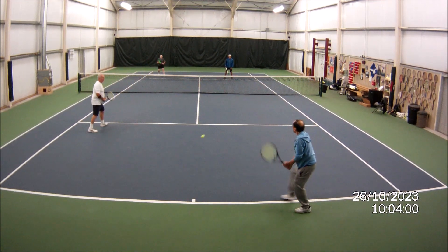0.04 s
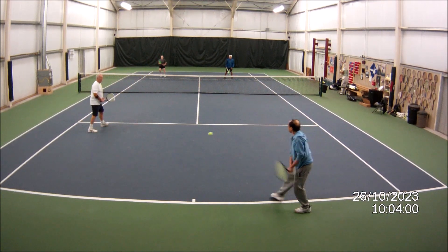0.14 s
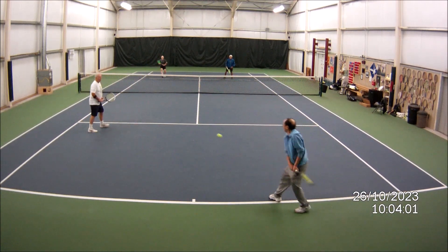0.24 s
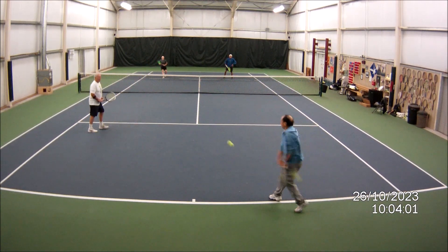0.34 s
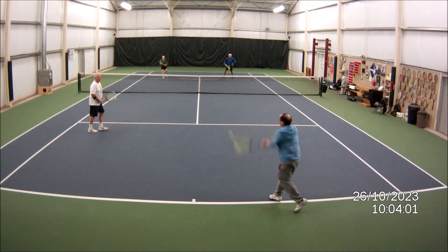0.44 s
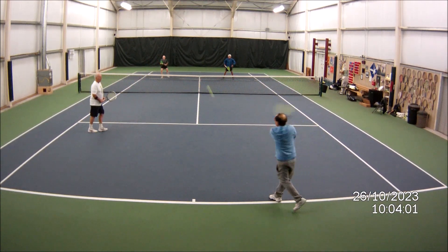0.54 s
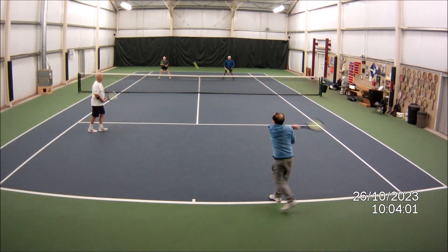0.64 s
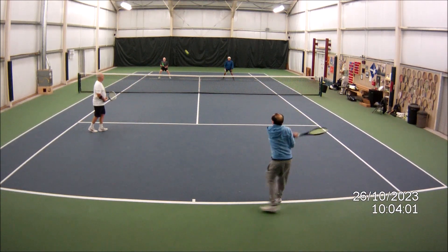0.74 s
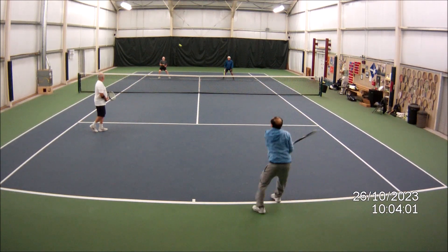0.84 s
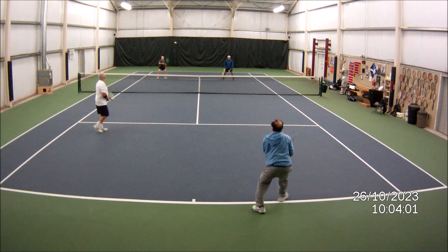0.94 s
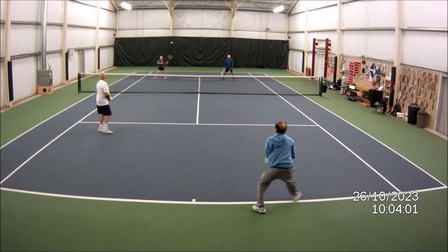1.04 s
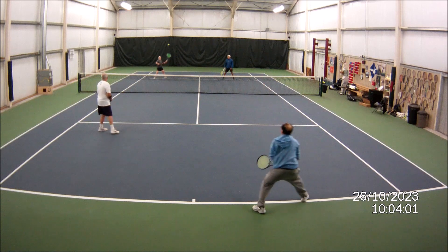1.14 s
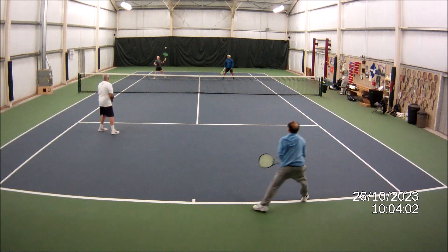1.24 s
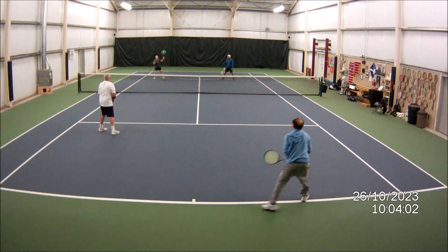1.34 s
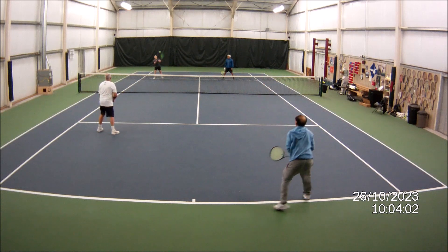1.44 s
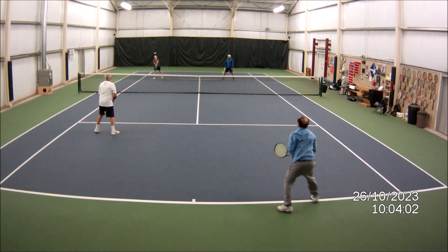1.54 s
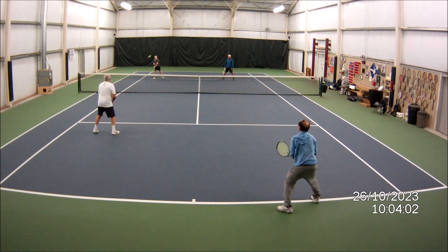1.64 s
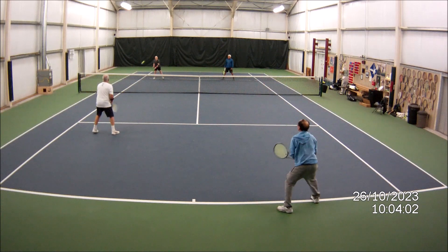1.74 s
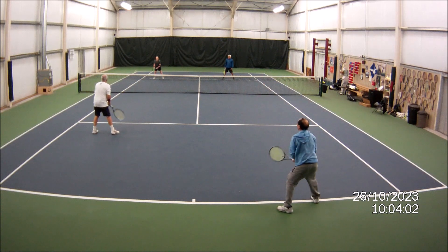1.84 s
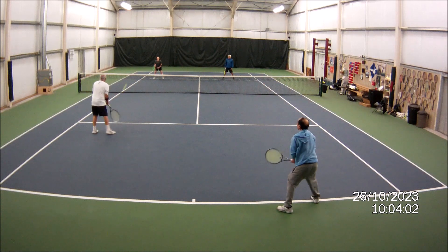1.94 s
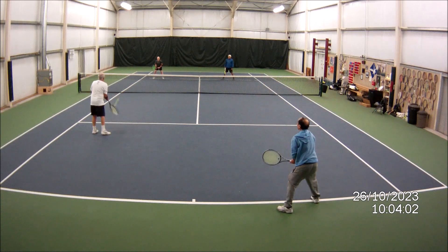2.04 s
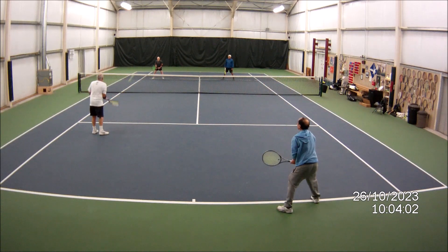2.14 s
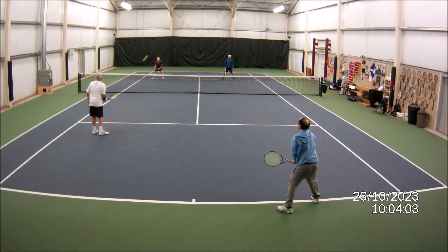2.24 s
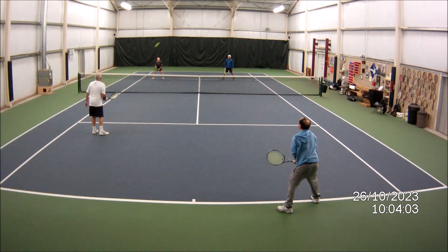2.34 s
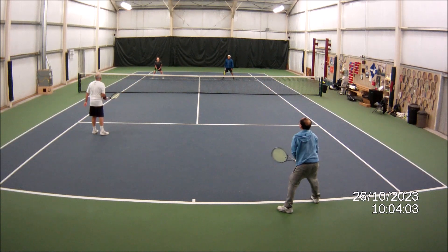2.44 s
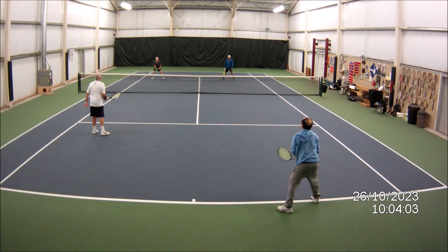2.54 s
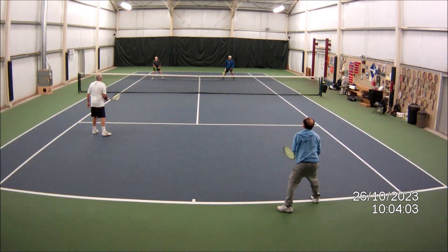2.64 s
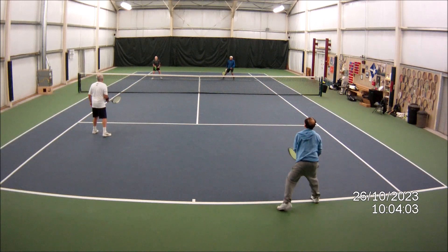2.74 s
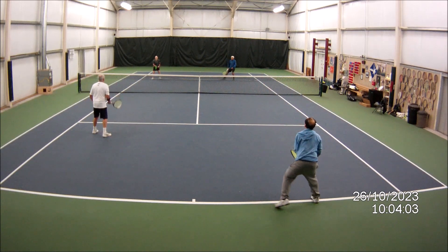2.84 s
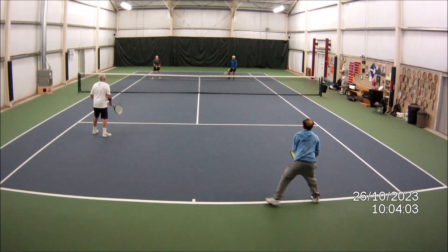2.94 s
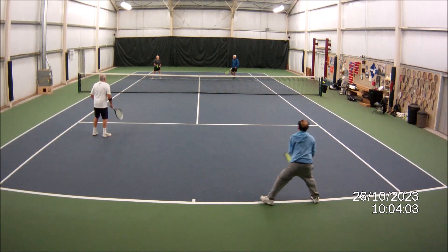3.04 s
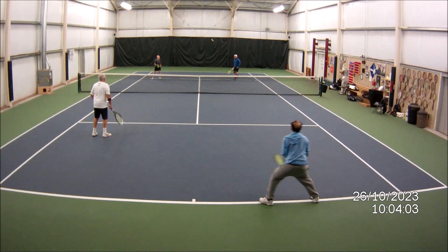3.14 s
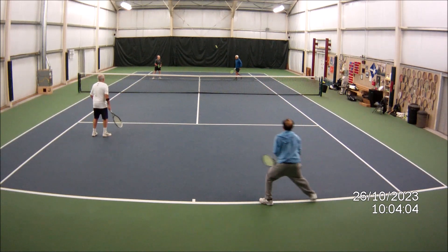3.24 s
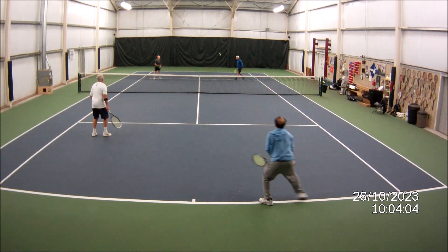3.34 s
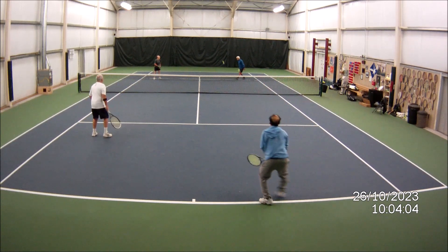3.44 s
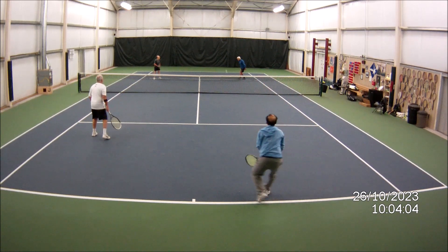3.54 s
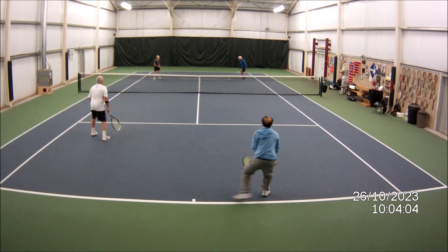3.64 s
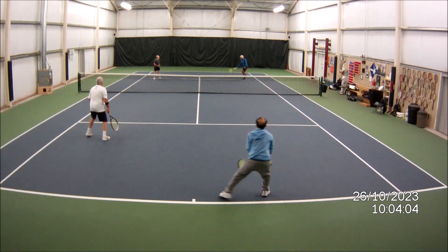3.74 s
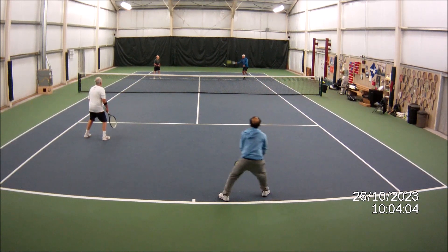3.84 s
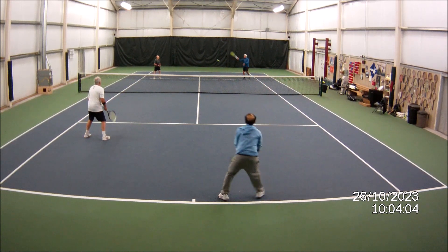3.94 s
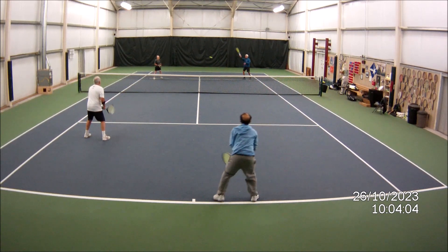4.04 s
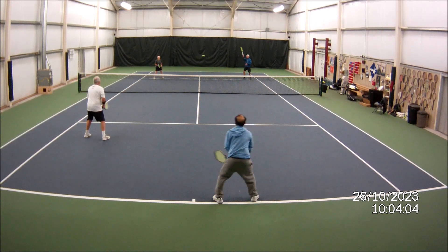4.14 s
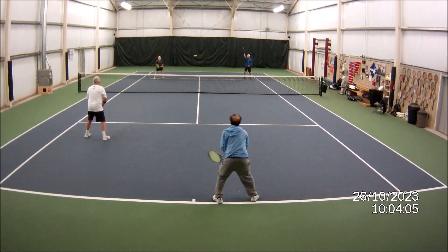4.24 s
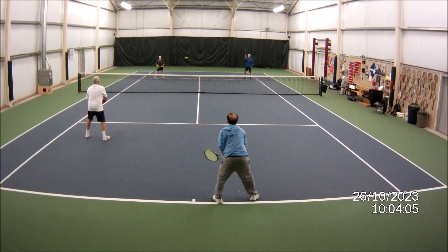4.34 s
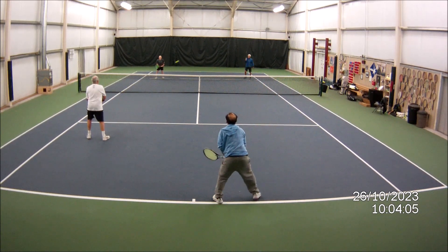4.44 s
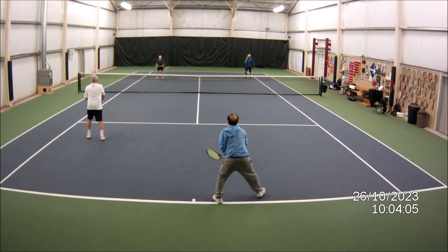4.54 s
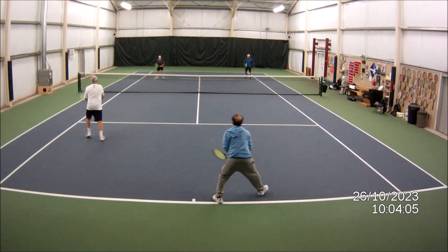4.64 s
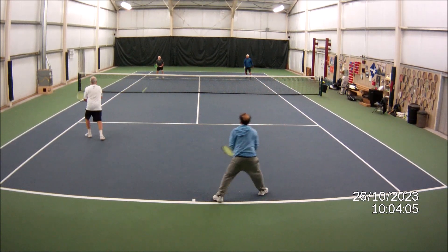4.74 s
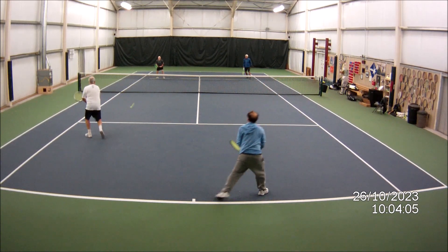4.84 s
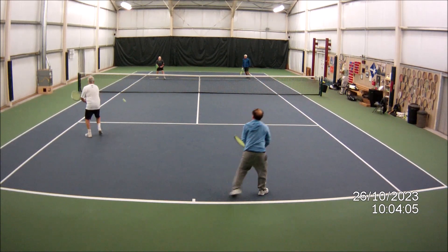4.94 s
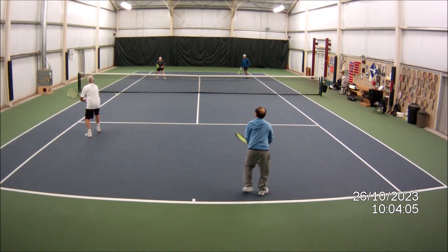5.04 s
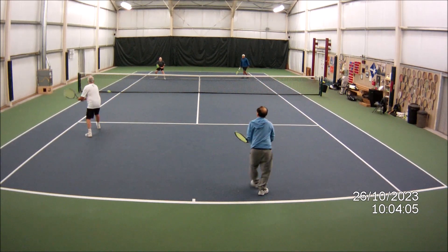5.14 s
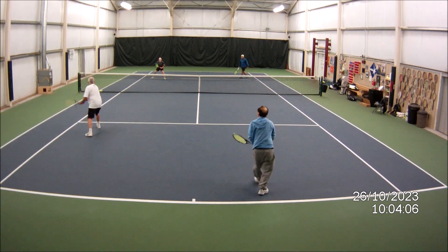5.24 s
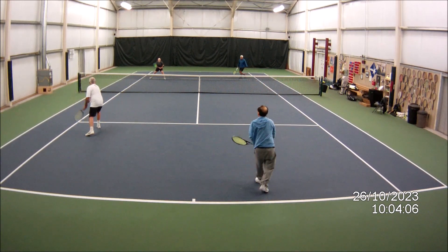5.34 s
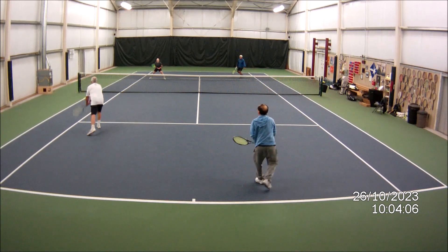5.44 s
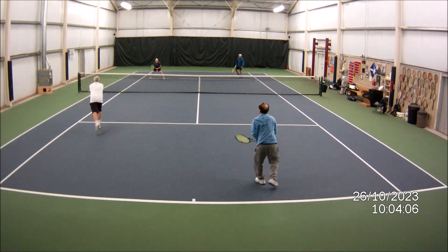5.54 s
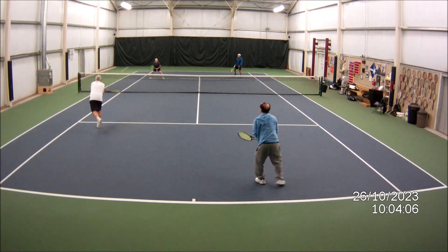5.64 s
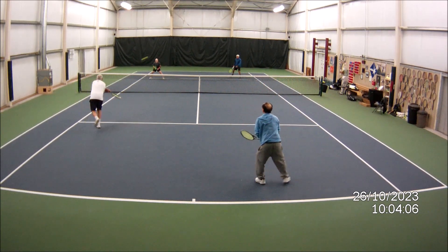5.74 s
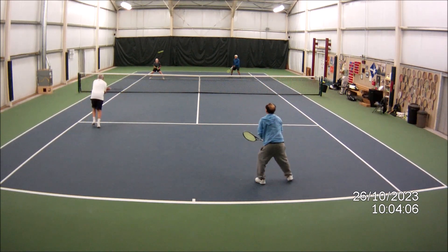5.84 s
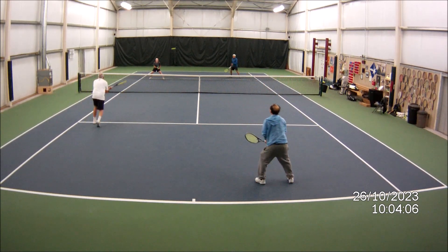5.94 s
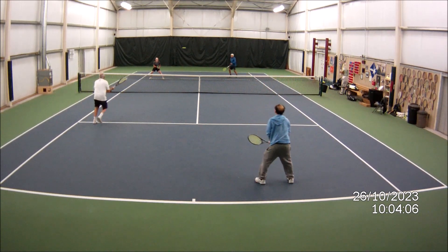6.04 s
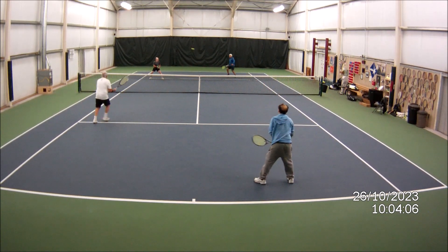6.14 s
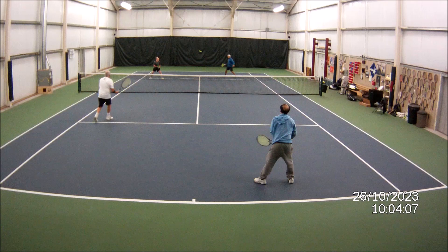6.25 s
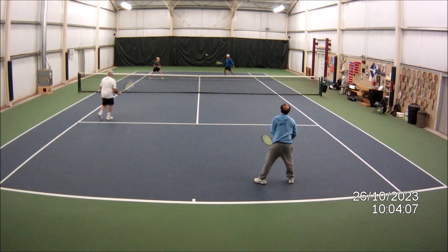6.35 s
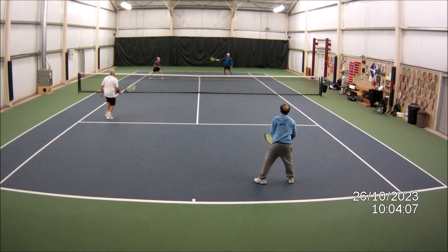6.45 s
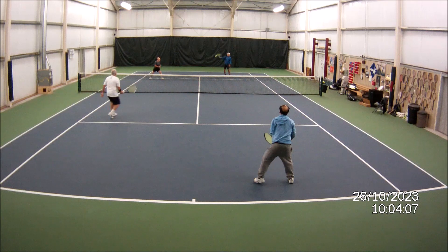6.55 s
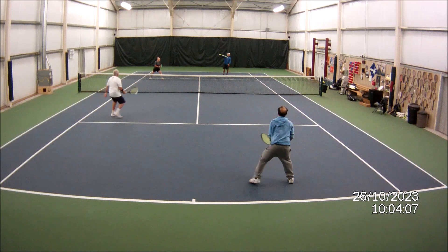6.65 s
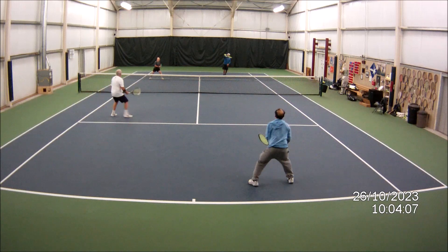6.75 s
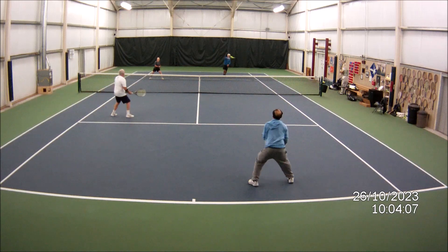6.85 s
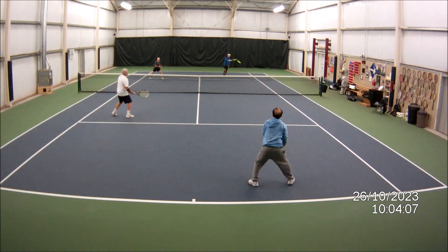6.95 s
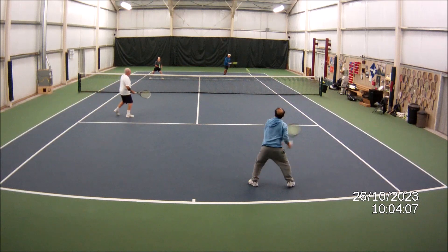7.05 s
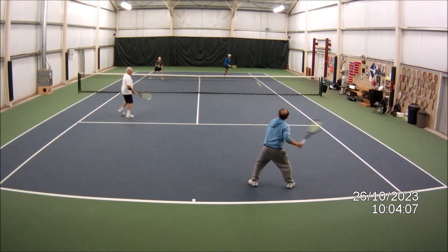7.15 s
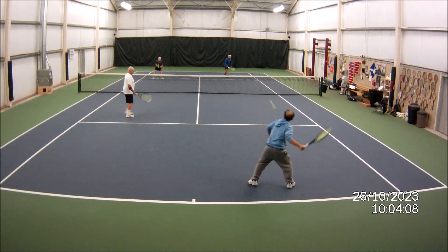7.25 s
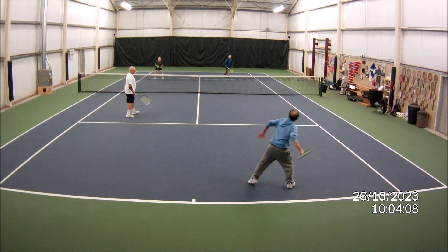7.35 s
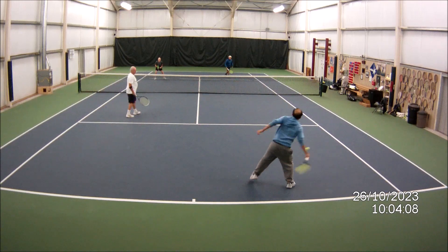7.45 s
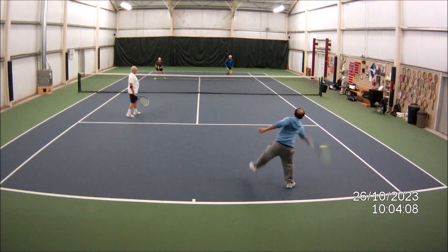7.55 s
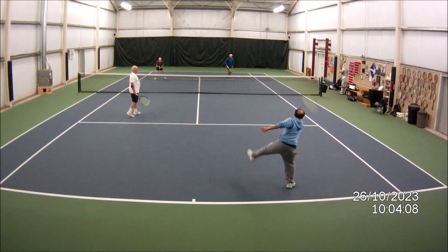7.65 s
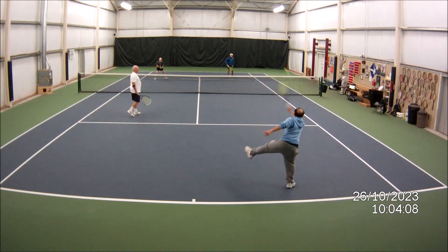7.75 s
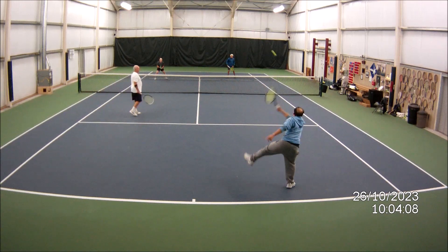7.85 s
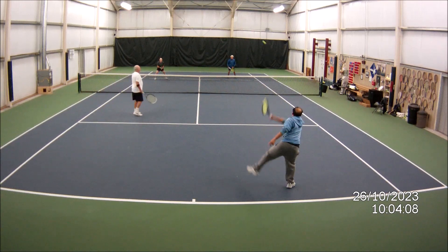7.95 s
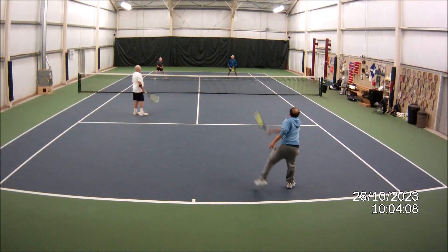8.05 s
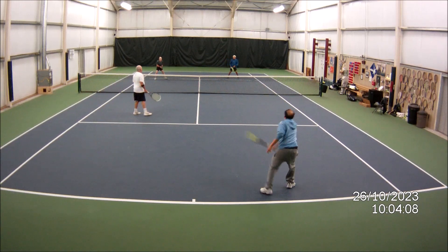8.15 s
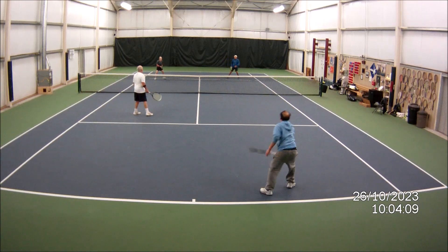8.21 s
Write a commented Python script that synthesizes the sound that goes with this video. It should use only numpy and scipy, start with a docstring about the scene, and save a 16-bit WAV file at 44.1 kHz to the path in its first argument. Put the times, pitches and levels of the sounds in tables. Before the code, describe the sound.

In a large, reverberant indoor court, racquets strike a tennis ball six times at an uneven pace. With the microphone behind one end, near hits crack sharply and far ones sound like hollow, echoing pocks. The ball bounces quietly and shoes scuff throughout, with rubber soles squeaking briefly just after the first hit and again near the end, over a faint hiss and hum.

```python
"""You hear a doubles tennis rally echoing in a big steel-clad hall, from behind one baseline.
Shoes scuff over the gritty court, the hollow ball bounces, and racquets hit it with a crack,
a pock and a thump. Twice, rubber soles squeak as they stick and slip. The farther away a hit is,
the more of it comes by way of the hall; its distance also sets when the far wall's echo returns.
A soft hiss and a faint mains hum lie underneath."""
import sys
import numpy as np
from scipy import signal
from scipy.fft import rfft, irfft
from scipy.io import wavfile

SR = 44100
rng = np.random.default_rng(int(sys.argv[2]) if len(sys.argv) > 2 else 0)


def materialize(psi):
    """Save the field psi as 16-bit PCM at rate SR to the path in sys.argv[1].

    A 1-D psi becomes a single channel; in a 2-D psi each row is a channel.
    """
    bounded = np.clip(np.atleast_2d(psi).T, -1, 1)
    quanta = np.round(bounded * 32767).astype(np.int16)
    wavfile.write(sys.argv[1], SR, quanta)


N = 365148
TOP_HZ = 15500  # upper edge of the treble


def undb(db):
    """Turn decibels into a number to multiply by."""
    return 10 ** (np.asarray(db) / 20)


def clock(seconds):
    """The time of each sample in a stretch of sound."""
    return np.arange(int(seconds * SR)) / SR


def level(x, db):
    """Set a sound's average (rms) level."""
    return x * undb(db) / np.sqrt(np.mean(x ** 2))


def blow(x, db):
    """Set a short sound's level as if its energy were spread over 10 ms."""
    return x * undb(db) / np.sqrt(np.sum(x ** 2) / (SR / 100))


def add(track, at, x):
    """Mix a sound into a track, starting at a time in seconds."""
    i = max(int(at * SR), 0)
    track[i:i + len(x)] += x[:len(track) - i]


def noise(points, count, tilt_db=0):
    """Noise shaped by (f/Hz, level/dB) points, plus tilt_db for each octave above 2000 Hz."""
    hz, db = np.transpose(points)
    octave = np.log2(np.clip(np.fft.rfftfreq(count, 1 / SR), hz[0], None))
    tilt = tilt_db * np.maximum(octave - np.log2(2000), 0)
    gain = undb(np.interp(octave, np.log2(hz), db) + tilt)
    return level(irfft(rfft(rng.standard_normal(count)) * gain, count), 0)


def wobble(t, rate_hz):
    """A curve that slides to a new random value rate_hz times a second."""
    return np.interp(t * rate_hz, np.arange(len(t)), rng.standard_normal(len(t)))


def ring(modes, t, contact_s):
    """A struck thing's tones swell during contact and fade; t60 is the time to fade by 60 dB."""
    swell = np.sin(np.pi / 2 * np.clip(t / contact_s, 0, 1)) ** 2
    detune = 1 + 0.0086 * rng.standard_normal(len(modes))
    return swell * sum(undb(db - 60 * t / t60) * np.sin(2 * np.pi * hz * d * (t - contact_s))
                       for (hz, db, t60), d in zip(modes, detune))


def hall_share_db(distance_m, balance_m=11.94):
    """The hall's share grows with distance: the direct sound weakens, but the hall's does not."""
    return 20 * np.log10(distance_m / balance_m)


# the tone colour of the quiet hall: f/Hz, relative level/dB
AIR_COLOUR = [(15, -61), (25, -7), (59, -19), (104, -14), (173, -2), (289, -6), (482, -11.5), (826, -7),
              (1200, -9.5), (1490, -5.5), (3440, -7), (6050, -2), (9810, -15), (14300, -18.5), (15500, -21)]
def air(hiss_db=-61, hum_db=-81):
    """The hall at rest: a soft hiss and the mains hum of its fittings."""
    hum = np.sin(2 * np.pi * 60 * np.arange(N) / SR)
    return undb(hiss_db) * noise(AIR_COLOUR, N) + level(hum, hum_db)


# the tone colour of a sole rubbing on grit: f/Hz, relative level/dB
GRIT_COLOUR = [(150, -20.5), (500, -24), (1000, -18), (2200, -8), (3500, -3), (5000, 1), (6400, 3),
               (7500, -2.5), (9000, -10.5), (12000, -19.5), (15500, -33)]
# shoe slides: t/s, distance/m, length/s, level/dB, treble tilt/(dB per octave)
SHOE_SLIDES = [ (0.043, 4.3, 0.059, -51.5, 1), (0.764, 12.4, 0.029, -34.5, -1.5),
               (0.815, 23, 0.018, -43.5, -3), (1.117, 5.3, 0.028, -45, 2), (1.252, 8.3, 0.14, -48.5, 4.5),
               (1.484, 6.7, .054, -42.5, 1), (1.852, 5, 0.25, -44, 4), (2.713, 9.7, 0.16, -59, 0),
               (2.976, 15, 0.15, -54, 2), (3.184, 25, 0.095, -53, -4), (3.262, 6, 0.22, -47, 10),
               (3.494, 7, 0.071, -44, 1.5), (3.72, 5, 0.069, -46, 9), (3.91, 4.5, 0.096, -38, -2),
               (4.023, 7.7, 0.031, -41.5, -1.5), (4.376, 11.4, 0.033, -46.5, 0.5),
               (4.522, 12, 0.04, -50.5, 0), (4.715, 13.6, .013, -43, -3.5), (4.81, 4, 0.096, -51.5, 14),
               (4.975, 9.2, 0.031, -51.5, 6), (5.212, 4, .01, -53, 7), (5.399, 28, 0.11, -52.5, 5),
               (5.676, 10.6, .058, -42.5, -0.5), (5.921, 9.3, 0.055, -39.5, -2),
               (6.177, 12.2, 0.051, -42, -1), (6.73, 5, .089, -44.5, 4), (6.998, 7.3, .034, -45, 0),
               (7.283, 5, .13, -59, 8), (7.849, 5, 0.15, -46, -2.5)]
def scuffs(near, far, catch_db=2.0, catch_hz=260, tread_hz=4600, tread_db=4, glance_share=0.2):
    """A sole drags over grit, catching and letting go; its tread rings differently on each slide."""
    t = clock(1 / 3)
    for at, distance_m, length, db, bright_db in SHOE_SLIDES:
        catches = undb(catch_db * wobble(t, catch_hz))
        press = np.clip(t / length / 0.12, 0, 1)
        release = np.clip(.5 + (1 - t / length) / 0.62, 0, 1)
        grit = noise(GRIT_COLOUR, len(t), tilt_db=bright_db)
        ring_hz = tread_hz * 2 ** rng.uniform(-0.64, 0.63)
        tread = signal.lfilter(*signal.iirpeak(ring_hz, Q=9, fs=SR), grit)
        scuff = level(grit + (undb(tread_db) - 1) * tread, db) * press * release * catches
        # a reflection right behind the direct sound colours it
        glance = glance_share * np.interp(t - 0.001308, t, scuff, left=0)
        add(near, at, (scuff + glance) / np.hypot(1, glance_share))
        add(far, at, undb(hall_share_db(distance_m)) * scuff)


# the hall's lingering sound, band by band: f/Hz, relative level/dB, t60/s
HALL_BANDS = [(120, 2.5, 1.9), (280, -2, 1.25), (514, -8.5, 1.3), (770, -8, 1.24), (853, -9, 2.7),
              (886, -11, 1.5), (1660, -5, 0.89), (2120, -4.5, 1.07), (2990, -3.5, 1.27), (4800, -1, 1.34),
              (6100, 0.5, 1.23), (8900, -1, 1.07), (15000, -3.5, 0.6)]
def hall(x, build_s=0.0076):
    """Countless echoes blend into a tail; each band of pitch has its own strength and fade."""
    t = clock(2)
    hz, db, t60 = np.transpose(HALL_BANDS)
    log_f = np.log(np.fft.rfftfreq(len(t), 1 / SR) + 1)
    white = rfft(rng.standard_normal(len(t)))
    tail = 0
    for share, band_db, decay in zip(np.eye(len(hz)), db, t60):
        fade = undb(-60 * t / decay) * np.clip(t / build_s, 0, 1) ** 2
        band = irfft(white * np.interp(log_f, np.log(hz), share), len(t))
        tail = tail + band * fade * undb(band_db) / np.sqrt(np.sum(fade ** 2))
    return signal.fftconvolve(x, tail)[:N]


# the tones of the hollow, felt-covered ball: f/Hz, relative level/dB, t60/s
BALL_TONES = [(800.5, -2.5, 0.02), (976, 8, 0.013), (1133, -2, 0.018), (1365, 4, 0.016), (1547, 1, 0.031)]
def ball(t, db, tilt_db):
    """The ball rings with a pock; a harder contact (more tilt_db) favours its higher tones."""
    tones = [(hz, tone_db + tilt_db * np.log2(hz / 1000), t60) for hz, tone_db, t60 in BALL_TONES]
    return blow(ring(tones, t, contact_s=.005), db)


# the low tones of a dull thump: f/Hz, relative level/dB, t60/s
THUMP_TONES = [(173, -7.5, 0.03), (258.3, 4.5, 0.031), (369, -2.5, 0.036), (654, -5, 0.019)]
# the tone colour of a slap or crack: f/Hz, relative level/dB
CRACK_COLOUR = [(200, -22), (600, -10.5), (1200, -4.5), (2400, -4), (3300, -4), (4200, -2), (6300, 0),
                (7500, -7), (9000, -15), (12000, -26.5), (15500, -38)]
# knocks on the court: t/s, distance/m, slap/dB, pock/dB, thump/dB, hardness/(dB per octave)
COURT_KNOCKS = [ (0.083, 16, -49, -48, -61.5, -9.5), (.345, 13.5, -50.5, -48.5, -58, -27),
                (3.654, 20.6, -46.5, -49, -61.5, 0), (3.769, 23.8, -40, -48, -63.5, 3),
                (4.854, 11.5, -46.5, -46, -55.5, 6), (7.113, 17, -66, -48, -72, -3),
                (7.385, 11.5, -40.5, -46, -51.5, -2), (8.088, 5.9, -40.5, -59, -53, -16)]
def knocks(near, far, attack_s=0.0015, slap_t60=0.032):
    """Ball bounces and other knocks on the hard court: a thump, a hollow pock and a small slap."""
    t = clock(1 / 10)
    envelope = np.clip(t / attack_s, 0, 1) * undb(-60 * t / slap_t60)
    for at, distance_m, slap_db, pock_db, thump_db, hardness_db in COURT_KNOCKS:
        thump = blow(ring(THUMP_TONES, t, contact_s=0.0039), thump_db)
        slap = noise(CRACK_COLOUR, len(t), tilt_db=-1.5) * envelope
        pock = ball(t, pock_db, hardness_db)
        radiate(near, far, at, distance_m, thump, pock, slap, slap_db)


def reflections(points, first_s=.014, full_s=0.023, t60=0.33, patchy_db=4.5, tilt_db=0):
    """Early echoes off the side walls and roof: random clumps of fading noise, new each time."""
    t = clock(1 / 4)
    clumps = np.interp(t, np.linspace(0, t[-1], num=64), rng.standard_normal(size=64))
    fade_db = -60 * np.maximum(t - full_s, 0) / t60
    return noise(points, len(t), tilt_db) * (t > first_s) * undb(patchy_db * clumps + fade_db)


def scatter(x):
    """Smear a sound into early echoes of about the same total energy."""
    paths = reflections([(100, 0), (15000, 0)])
    return signal.fftconvolve(x, paths / np.sqrt(np.sum(paths ** 2)))


def radiate(near, far, at, distance_m, thump, pock, crack, crack_db, hiss_t60=0.49):
    """A hit arrives directly, then off nearby walls, then through the whole hall."""
    t = clock(1 / 4)
    hall_db = hall_share_db(distance_m)
    early_db = hall_db - 2.5
    add(near, at, thump + pock + blow(crack, crack_db))
    add(near, at, undb(early_db) * scatter(undb(4) * thump + undb(-3) * pock))
    # the crack differs in every direction, so its echoes blur to a hiss
    add(near, at, blow(reflections(CRACK_COLOUR, tilt_db=1.0), crack_db + early_db))
    hiss = noise(CRACK_COLOUR, len(t)) * undb(-60 * t / hiss_t60)
    add(far, at, blow(hiss, crack_db + hall_db))
    add(far, at, undb(hall_db) * (undb(1) * thump + pock))


def footsteps(near, far, count=60, step_db=-72, spread_db=2, tap_hz=1050, brush_db=-63, brush_t60=.15):
    """The players shift their feet at random: each faint step is a thud, a tap and a brush of the sole."""
    t = clock(1 / 10)
    times = rng.uniform(0, N / SR, count)
    for at, (size, pitch) in zip(times, rng.standard_normal((count, 2))):
        tap = ring([(tap_hz * 2 ** (pitch / 3), 0, .02)], t, contact_s=0.0035)
        brush = noise(GRIT_COLOUR, len(t)) * np.clip(t / .008, 0, 1) * undb(-60 * t / brush_t60)
        heel = ring(THUMP_TONES, t, contact_s=0.005)
        step = blow(heel, step_db) + blow(tap, step_db) + blow(brush, brush_db)
        step *= undb(spread_db * size)
        add(near, at, step)
        add(far, at, undb(-3) * step)


# racquet hits on the ball: t/s, distance/m, crack/dB, pock/dB, thump/dB, string f/Hz
RACQUET_HITS = [ (0.4083, 5.65, -18, -27.5, -36, 1780), (1.3788, 19.9, -31, -32, -49, 1475),
                (2.0255, 10, -28.5, -40, -42.5, 773), (5.48, 11, -28, -38.5, -50, 2320),
                (6.4733, 25, -29.5, -30, -50, 1482), (7.554, 8.1, -23, -36, -36.5, 1740)]
def strokes(near, far, attack_s=0.0017, dwell_s=0.0072, crack_t60=0.016, string_t60=0.033, bed_hz=575):
    """The strings crack while the ball presses on them; then ball and strings ring on."""
    t = clock(1 / 10)
    contact = np.clip(t / attack_s, 0, 1) * undb(-60 * np.maximum(t - dwell_s, 0) / crack_t60)
    raised_tones = [(hz * 1.188, db, t60) for hz, db, t60 in THUMP_TONES]
    for at, distance_m, crack_db, pock_db, thump_db, string_hz in RACQUET_HITS:
        pock = ball(t, pock_db, tilt_db=-6 + 1.5 * hall_share_db(distance_m))  # brighter when far
        thump = blow(ring(raised_tones, t, contact_s=0.0049), thump_db)
        string = blow(ring([(string_hz, 0, string_t60)], t, contact_s=.004), pock_db - 1.5)
        crack = noise(CRACK_COLOUR, len(t), tilt_db=1.5) * contact
        # part of the crack bounces back across the bed of strings, giving it a hint of pitch
        crack = crack + .4 * np.interp(t - 1 / bed_hz, t, crack, left=0)
        radiate(near, far, at, distance_m, thump, pock + string, crack, crack_db)
        flutter_echo(near, at, distance_m, pock)


def flutter_echo(near, at, distance_m, pock, round_trip_s=.203, far_wall_db=-12, both_walls_db=-18):
    """Only the pock runs back and forth between the end walls, whose curtains swallow the treble."""
    echoes = np.zeros(SR)
    far_wall_s = round_trip_s - 2 * distance_m / 343  # sound travels 343 m/s
    for delay, db in ((far_wall_s, far_wall_db), (round_trip_s, both_walls_db)):
        for trip in range(3):
            add(echoes, delay + trip * round_trip_s, pock * undb(db - 6.5 * trip))
    add(near, at, echoes)
    add(near, at, undb(-2) * scatter(echoes))


# how strongly a sole gives off each tone of a squeak: f/Hz, relative level/dB
SOLE_COLOUR = [(3100, -1.5), (6400, -1.5), (8700, -26), (13000, -47)]
# the tone colour of the hiss in a squeak: f/Hz, relative level/dB
RASP_COLOUR = [(1000, -20), (2900, -21), (3350, 2), (4100, 1.5), (5000, -8), (6500, 2), (8000, -8.5),
               (9600, -10), (15500, -47)]
# shoe squeaks: t/s, distance/m, length/s, start f/Hz, end f/Hz, level/dB, wander/(share of pitch)
SHOE_SQUEAKS = [ (0.609, 7.5, 0.025, 3161, 3243, -18, 0.016), (.668, 16.3, 0.022, 3207, 3091, -26.5, .017),
                (.669, 4.5, 0.021, 5640, 5780, -33.5, .022), (7.876, 13, 0.039, 2997, 3102, -31.5, .028),
                (7.933, 16.5, 0.0542, 2962, 3028, -40, 0.034)]
def squeaks(near, far, hiss_db=-16, early_db=-6, grip_change_hz=800, shimmer=.12):
    """Rubber sticks and slips thousands of times a second; its unsteady grip shakes pitch and level."""
    t = clock(1 / 10)
    for at, distance_m, length, start_hz, end_hz, db, wander in SHOE_SQUEAKS:
        jitter = 1 + wander * wobble(t, grip_change_hz)
        shake = 1 + shimmer * wobble(t, grip_change_hz)
        hz = np.interp(t, [0, length], [start_hz, end_hz]) * jitter
        phase = 2 * np.pi * np.cumsum(hz) / SR
        harmonics = np.arange(1, int(TOP_HZ / start_hz) + 1)
        gains = undb(np.interp(harmonics * start_hz, *np.transpose(SOLE_COLOUR)))
        first, *overtones = (gain * np.sin(k * phase) for k, gain in zip(harmonics, gains))
        # the overtones grow as the weight comes onto the foot
        weight = np.clip(t / (length / 2), .35, 1)
        tone = np.sqrt(2) * (first + weight * sum(overtones)) * shake
        grip = np.clip(t / 0.0014, 0, 1) * np.clip((length - t) / 0.0066, 0, 1)
        squeak = (tone + undb(hiss_db) * noise(RASP_COLOUR, len(t))) * grip * undb(db)
        add(near, at, squeak)
        add(near, at, undb(early_db) * scatter(squeak))
        add(far, at, undb(hall_share_db(distance_m)) * squeak)


def scene(low_cut_hz=115):
    """The rally in mono: near holds direct sound and echoes, far feeds the hall's long tail."""
    near, far = np.zeros(N), np.zeros(N)
    for source in (strokes, knocks, footsteps, scuffs, squeaks):
        source(near, far)
    # things as small as balls and shoes give off little bass
    low_cut = signal.butter(2, low_cut_hz, "high", fs=SR, output="sos")
    mono = signal.sosfilt(low_cut, near + hall(far)) + air()
    return np.array([mono, mono])


def record(dry):
    """Cut away the very top of the treble."""
    return signal.sosfilt(signal.ellip(8, .2, 70, TOP_HZ, fs=SR, output="sos"), dry)


dry = scene()
out = record(dry)
materialize(out)
```